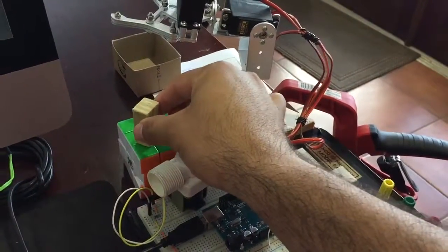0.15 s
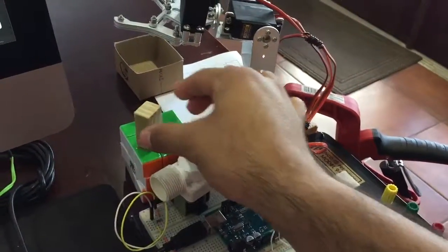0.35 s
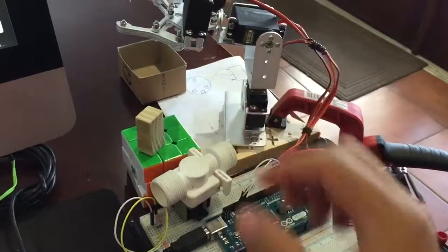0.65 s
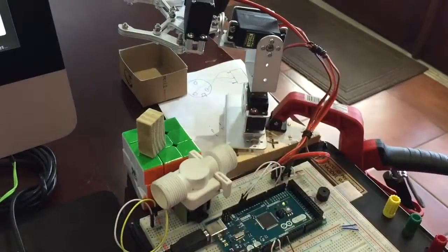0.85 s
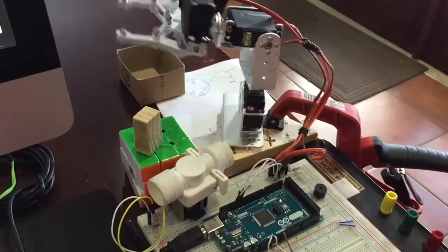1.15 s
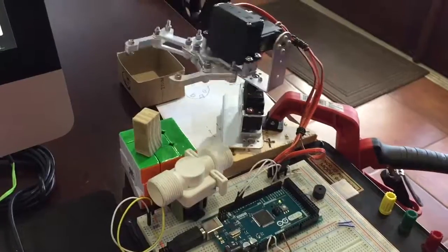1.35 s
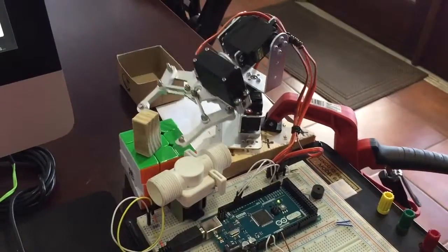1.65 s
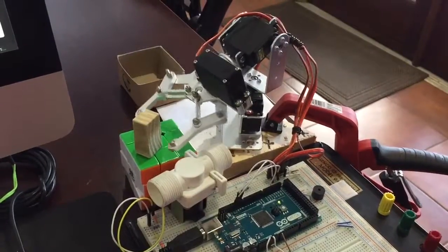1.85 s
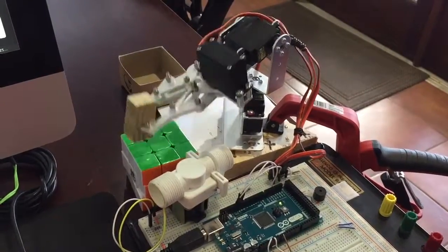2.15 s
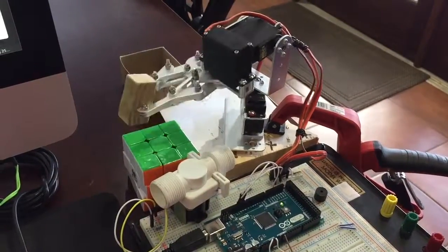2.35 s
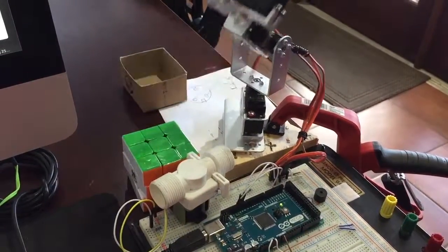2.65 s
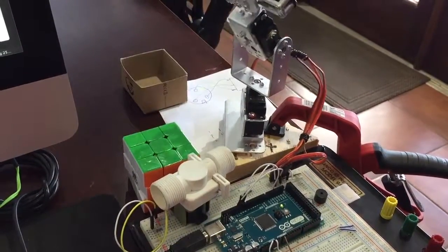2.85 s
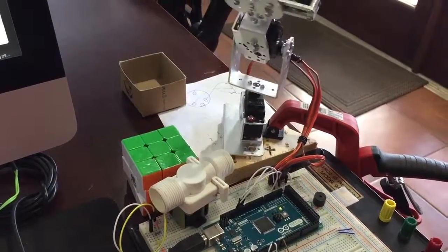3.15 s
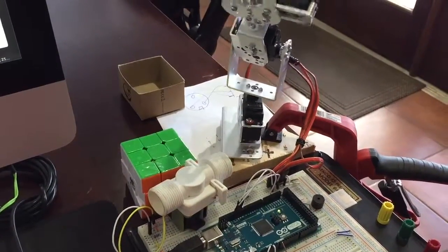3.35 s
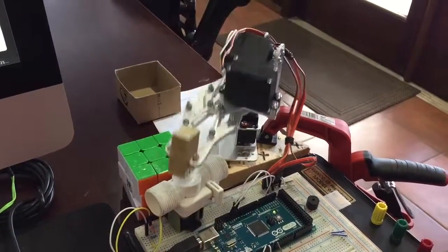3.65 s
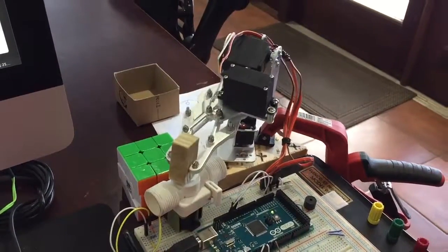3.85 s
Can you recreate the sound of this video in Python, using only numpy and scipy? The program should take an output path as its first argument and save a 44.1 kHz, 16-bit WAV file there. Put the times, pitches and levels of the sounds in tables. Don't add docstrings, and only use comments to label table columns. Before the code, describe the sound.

Small servo motors whirr and whine in short gritty bursts as a desktop robot arm moves, after a soft wood-block knock and dull thuds; sharp joint clicks between moves, close microphone, quiet hard-floored room.

```python
import sys
import numpy as np
from scipy import signal
from scipy.fft import rfft, irfft
from scipy.io import wavfile
from scipy.ndimage import map_coordinates

SR = 44100
rng = np.random.default_rng(int(sys.argv[2]) if len(sys.argv) > 2 else 0)


def dump_mix(stems):
    frames = np.atleast_2d(stems).T
    limited = np.clip(frames, -1, 1)
    pcm = np.round(limited * 32767).astype(np.int16)
    wavfile.write(sys.argv[1], SR, pcm)


def invert_db(x):
    u = np.asarray(x, float) / 20
    return 10 ** u


N = 176400
T = np.arange(N) / SR

# (frequency [Hz], level [dB per Hz])
AIR_COLOUR = [(12, -64), (20, -26), (55, -0.5), (328, -5), (357, -5.5), (642, -13.5), (802, -12),
              (1480, -11.5), (16000, -30)]
# (frequency [Hz], width [Hz], height [dB])
AIR_RINGS = [(2210, 390, 7)]
# (frequency [Hz], level [dB rms])
ELECTRIC_HUMS = [(586.8, -86.5), (646.0, -88), (1529, -87.5)]
# (frequency [Hz], 60 dB decay [s])
ROOM_DECAY = [(150, 0.65), (2000, 0.47), (6000, 0.71), (9500, 0.39), (11000, 0.43), (16000, 0.22)]

# (frequency [Hz], level [dB], free 60 dB decay [s], damped to 0.21
BLOCK_TONES = [(424, 7, 0.15), (653, 2.5, 0.17), (823, 3.5, 0.16), (1012, 2, 0.12), (1370, 2, 0.034),
               (1570, 4.5, 0.072), (1957, 1, 0.13), (2700, -3, 0.071), (3300, -7, 0.044)]
# (time [s], level [dB], pitch factor [1])
KNOCKS = [
    (0.111, -38.5, 0.99),
    (2.102, -44, .9),
    (2.135, -44, 0.88),
]
# (time [s], level [dB])
THUDS = [
    (0.463, -50),
    (.484, -51),
]
# (time [s], level [dB], centre frequency [Hz], 60 dB decay [s])
TICKS = [
    (.112, -39, 900, 0.043),
    (1.144, -54.5, 2500, 0.24),
    (1.159, -38.5, 1860, 0.026),
    (1.17, -42, 12400, 0.011),
    (1.172, -44, 3500, 0.021),
    (1.884, -39, 11800, 0.0066),
    (2.159, -40, 6000, 0.029),
    (2.937, -29, 11600, 0.0097),
    (3.29, -57, 7850, 0.014),
    (3.48, -35.5, 2400, 0.022),
]

# (time [s], level [dB])
REACH_EFFORT = [(1.585, -57), (1.595, -29.5), (1.6, -40.5), (1.61, -33.5), (1.67, -34.5), (1.735, -36.5),
                (1.75, -39)]
LIFT_EFFORT = [(2.19, -53.5), (2.22, -45.5), (2.25, -38), (2.28, -42), (2.32, -38.5), (2.345, -45.5),
               (2.37, -51)]
SWING_EFFORT = [(2.48, -54), (2.5, -39.5), (2.56, -32), (2.6, -32.5), (2.7, -34.5), (2.79, -34),
                (2.85, -43.5), (2.88, -51)]
LOWER_EFFORT = [(3.534, -45), (3.55, -37), (3.575, -27.5), (3.598, -33.5), (3.624, -36.5), (3.651, -29.5),
                (3.69, -31.5), (3.745, -34), (3.77, -36.5), (3.803, -35)]
WAKE_EFFORT = [(1.22, -56.5), (1.26, -50), (1.3, -47), (1.37, -49.5), (1.42, -53.5), (1.45, -51.5)]
TURN_EFFORT = [(3.11, -81), (3.139, -55.5), (3.19, -47.5), (3.22, -56), (3.26, -58.5), (3.299, -65)]
GRIP_EFFORT = [(1.87, -62.5), (1.92, -49.5), (2.0, -49.5), (2.12, -47.5), (2.17, -48)]
TILT_EFFORT = [(3.436, -59.5), (3.47, -56.5), (3.482, -46.5), (3.52, -46.5), (3.54, -69)]
NUDGE_EFFORT = [(1.535, -67), (1.56, -56), (1.59, -51.5)]
# (time [s], level [dB])
SLACK_EFFORTS = [
    [(1.218, -58), (1.25, -35), (1.272, -56)],
    [(3.12, -68), (3.14, -51.5), (3.21, -67), (3.25, -83)],
]

# (start [s], stop [s], top shaft speed [Hz], hum [dB], commutator whine [dB])
LIFT_RUNS = [
    (2.194, 2.324, 203.5, -52, -48),
    (2.483, 2.792, 327.1, -51.5, -42.5),
]
DROP_RUNS = [
    (1.531, 1.693, 289.5, -57, -55.5),
    (3.515, 3.773, 272.2, -57.5, -53),
]
BASE_RUNS = [
    (1.235, 1.355, 355, -59.5, -52),
    (1.25, 1.4, 292, -68, -64.5),
    (1.22, 1.412, 150, -60.5, -72.5),
    (3.12, 3.24, 293, -51, -55),
    (3.2, 3.3, 285, -57.5, -78),
]
GRIP_RUNS = [
    (1.862, 2.139, 176.5, -45, -95),
]
TILT_RUNS = [
    (3.44, 3.525, 268, -57.5, -71.5),
]
# (time [s], width [s], level [dB])
FALTERS = [
    (2.4, 0.015, -18),
    (2.4, 0.017, -6),
    (1.64, .03, -13),
    (3.225, 0.0068, -9),
    (3.27, 0.014, -10),
    (3.61, 0.028, -13.5),
    (3.685, 0.029, -20),
    (1.345, .006, -8),
]

# (frequency [Hz], level [dB per Hz])
LIFT_CASE = [(70, -11.5), (240, -2.5), (500, -38), (800, -20), (1900, -10), (3700, -13.5), (8700, 2.5),
             (16000, -25)]
BIG_CASE = [(35, -67), (60, -8.5), (256, -6), (607, -18), (862, -10), (1910, -12.5), (5330, -9),
            (7940, 6.5), (16000, -25)]
BASE_CASE = [(35, -84), (60, -23), (262, -10), (749, -14.5), (1440, -5), (1910, -5), (4420, -16.5),
             (6740, -23), (16000, -18)]
SLACK_CASE = [(300, -32), (1500, -3.5), (3900, 6.5), (4600, -9), (7000, -5.5), (16000, -27)]
GRIP_CASE = [(150, -48), (250, -6), (519, -24), (988, 1), (1160, -18), (1850, -6), (3170, -9.5),
             (6940, -3.5), (16000, -7.5)]
# (frequency [Hz], width [Hz], height [dB])
BIG_RINGS = [(900, 182, 8), (1857, 650, 12.5), (2500, 880, 8), (4380, 1220, 8), (5600, 230, -2.5),
             (6130, 940, 6.5), (7000, 70, 7), (7880, 110, 4), (9110, 550, 6.5), (11360, 170, 8),
             (12780, 1060, 10.5), (14500, 1280, 19.5)]
LIFT_RINGS = [(3350, 540, 12), (2146, 51, 5), (2740, 320, -6)]
SWING_RINGS = [(997, 43, 8.5), (1990, 540, -5.5), (4403, 370, 6.5), (6910, 1300, 7), (8540, 350, 5)]
DROP_RINGS = [(842, 81, 4.5), (1904, 104, 5), (2400, 130, 3), (2860, 200, 3), (3500, 640, -2.5),
              (1220, 230, -3)]
BASE_RINGS = [(128, 46, 22.2), (250, 22, 6), (1015, 113, 19.6), (1463, 236, 13.2), (2400, 204, 12.4),
              (3510, 280, 8.3), (6755, 1100, 21.2), (8830, 1100, 14.7)]
GRIP_RINGS = [(1015, 1200, 4.6), (2400, 1400, 15), (4240, 710, 3.3), (6850, 980, 10.8), (8700, 640, 6.3),
              (14600, 2100, 5.5)]

COMMAND_HZ = 49.5


def unit(x):
    return x / np.sqrt(np.mean(x ** 2) + 1e-20)


def along(points, hz):
    f, v = np.transpose(points)
    return np.interp(np.log(hz + 1), np.log(f + 1), v)


def wobble(rate, size=N):
    knots = rng.standard_normal(int(size * rate / SR) + 4)
    return map_coordinates(knots, [np.arange(size) * rate / SR])


def coloured(x, spectrum, rings):
    size = 8192
    hz = np.fft.rfftfreq(size, 1 / SR)
    humps = sum(height / (1 + (2 * (hz - centre) / width) ** 2) for centre, width, height in rings)
    db = np.maximum(along(spectrum, hz), -90) + humps
    cepstrum = irfft(np.log(invert_db(db)))
    cepstrum[1:size // 2] *= 2
    cepstrum[size // 2 + 1:] = 0
    return signal.fftconvolve(x, irfft(np.exp(rfft(cepstrum))))[:N]


def hush():
    air = unit(coloured(rng.standard_normal(N), AIR_COLOUR, AIR_RINGS)) * invert_db(-70 + 0.09 * wobble(8.2))
    hums = sum(invert_db(db + 4.0 + 2.1 * wobble(4.9)) * np.sin(2 * np.pi * hz * T) for hz, db in ELECTRIC_HUMS)
    return air + hums


def room(x):
    hz, t, z = signal.stft(rng.standard_normal(SR), SR, nperseg=256)
    fading = z * invert_db(-60 * t / along(ROOM_DECAY, hz)[:, None])
    tail = signal.istft(fading, SR, nperseg=256)[1]
    delayed = np.pad(x, (300, 0))
    return signal.fftconvolve(delayed, tail / np.linalg.norm(tail))[:N]


def taps():
    out, t = np.zeros(N + SR), np.arange(SR // 4) / SR
    for s, db, pitch in KNOCKS:
        ring = sum(invert_db(level - 60 * t / (0.21 * t60)) * np.sin(2 * np.pi * hz * pitch * t)
                   for hz, level, t60 in BLOCK_TONES)
        soft_start = 1 - np.exp(-t / 0.0015)
        out[round(s * SR):][:len(t)] += invert_db(db - 8) * ring * soft_start
    thud_hz, thud_t60 = 180, 0.056
    for s, db in THUDS:
        out[round(s * SR):][:len(t)] += invert_db(db - 60 * t / thud_t60) * np.sin(2 * np.pi * thud_hz * t)
    for s, db, hz, t60 in TICKS:
        band = signal.butter(2, [0.44 * hz, min(1.31 * hz, 15800)], "band", fs=SR)
        puff = unit(signal.lfilter(*band, rng.standard_normal(len(t))))
        soft_start = 1 - np.exp(-t * hz / 9)
        out[round(s * SR):][:len(t)] += invert_db(db - 60 * t / t60) * puff * soft_start
    return out[:N]


def motor(start, stop, top_hz, hum_db, whine_db, spin_up, slope_db, waver, strain_db, coast, hum_fade,
          break_db=4, second_db=0, hum_rise=0, ripple=0, kick_s=0):
    poles = 5
    after = np.maximum(T - stop, 0)
    speed = (1 - np.exp(-np.maximum(T - start, 0) / spin_up)) * np.exp(-after / coast)
    kicks = ripple * np.cos(2 * np.pi * COMMAND_HZ * (T - kick_s))
    shaft_hz = top_hz * speed
    angle = 2 * np.pi * np.cumsum(shaft_hz * (1 + kicks + waver * wobble(120))) / SR

    k = np.arange(1, int(.36 * SR / top_hz / poles) + 1)[:, None]
    span = slice(round(start * SR), round((stop + 0.097) * SR))
    missing_speed = np.minimum(1 - speed[span], 0.34)
    strain = np.where(k > 1, 1, .45) * strain_db * missing_speed
    breaks = np.minimum([wobble(48.6, size=len(angle[span])) for _ in k], .4) * np.minimum(k / 4, .6)
    level_db = slope_db * np.log2(k) + strain + second_db * (k == 2) + break_db * breaks
    whine = np.zeros(N)
    whine[span] = np.sum(invert_db(level_db) * np.sin(k * poles * angle[span] + k * k), axis=0)
    whine *= invert_db(whine_db + 3.5) * np.exp(-after / 0.019)

    boom = 1 + 2 / (1 + ((shaft_hz - 249) / 32) ** 2)
    table = boom / (1 + (140 / (shaft_hz + 1)) ** 6)
    hum_level = invert_db(hum_db + (2.5 + 50 * waver) * wobble(30)) * np.exp(-after / hum_fade)
    hum = hum_level * np.sin(angle) * table * speed ** hum_rise

    falter_db = sum(db * np.exp(-((T - s) / wide) ** 2) for s, wide, db in FALTERS)
    pull = speed ** 2 * invert_db(falter_db)
    return pull * hum, pull * whine


def servo(moves, runs, case, rings, grit_db, surge_db, kick_db=0, **drive):
    unevenness_db = grit_db * (wobble(900) + 0.11 * wobble(250)) + surge_db * wobble(70)
    impacts = rng.standard_normal(N) * invert_db(unevenness_db)
    kicks = invert_db(kick_db * np.cos(2 * np.pi * COMMAND_HZ * (T - 3.2)))
    teeth = coloured(unit(impacts * kicks), case, rings)
    effort = np.zeros(N)
    for rows in moves:
        s, effort_db = np.transpose(rows)
        release = np.exp(-np.maximum(T - s[-1], 0) / 0.0028)
        effort += (T > s[0]) * release * invert_db(np.interp(T, s, effort_db))
    hum, whine = sum((np.array(motor(*run, **drive)) for run in runs), np.zeros((2, N)))
    return (effort * teeth + coloured(whine, case, rings)) / np.std(teeth) + hum


def arm():
    lift = servo([LIFT_EFFORT], LIFT_RUNS[:1], LIFT_CASE, BIG_RINGS + LIFT_RINGS,
                 grit_db=2.5, surge_db=1.6, waver=.01, ripple=.05, kick_s=2.1,
                 spin_up=.021, slope_db=-1.5, strain_db=4, coast=.07, hum_fade=0.036)
    swing = servo([SWING_EFFORT], LIFT_RUNS[1:], LIFT_CASE, BIG_RINGS + SWING_RINGS,
                  grit_db=2.5, surge_db=1.5, waver=.009, second_db=5, break_db=5,
                  spin_up=.052, slope_db=-11, strain_db=51.5, coast=0.37, hum_fade=0.051)
    drop = servo([REACH_EFFORT, LOWER_EFFORT], DROP_RUNS, BIG_CASE, BIG_RINGS + DROP_RINGS,
                 grit_db=2.4, surge_db=1.3, waver=.03, break_db=9,
                 spin_up=.04, slope_db=-5.5, strain_db=2, coast=0.085, hum_fade=0.2)
    base = servo([WAKE_EFFORT, TURN_EFFORT, np.add(TILT_EFFORT, [0, -6])], BASE_RUNS, BASE_CASE, BASE_RINGS,
                 grit_db=2.5, surge_db=1.8, kick_db=2, waver=.03, break_db=11, ripple=.03, hum_rise=4,
                 spin_up=.03, slope_db=-8, strain_db=34, coast=.3, hum_fade=0.014)
    slack = servo(SLACK_EFFORTS, TILT_RUNS, SLACK_CASE, BASE_RINGS,
                  grit_db=-0.5, surge_db=3.0, kick_db=1.5, waver=0.0298, hum_rise=3,
                  spin_up=0.027, slope_db=0, strain_db=-8, coast=.27, hum_fade=.03)
    grip = servo([GRIP_EFFORT, NUDGE_EFFORT, np.add(TILT_EFFORT, [0, -3])], GRIP_RUNS, GRIP_CASE, GRIP_RINGS,
                 grit_db=2.5, surge_db=1, waver=.003,
                 spin_up=.05, slope_db=7.5, strain_db=-13.0, coast=0.16, hum_fade=0.05)
    return lift + swing + drop + base + slack + grip


def scene():
    near = arm() + taps()
    echo = invert_db(-8.5) * room(near)
    return (near + echo + hush())[None]


def low_pass(x):
    return signal.sosfilt(signal.butter(12, 16310, fs=SR, output="sos"), x)


def record(dry):
    top_hz = 15850
    passed = np.fft.rfftfreq(N, 1 / SR) < top_hz
    mix = irfft(rfft(dry) * passed, N)
    return low_pass(mix)


dry = scene()
out = record(dry)
dump_mix(out)
```